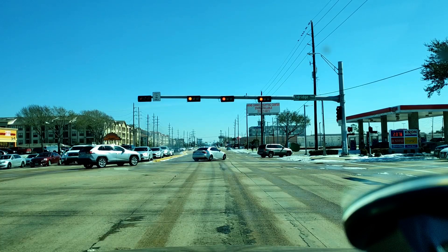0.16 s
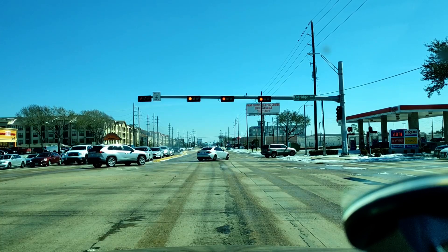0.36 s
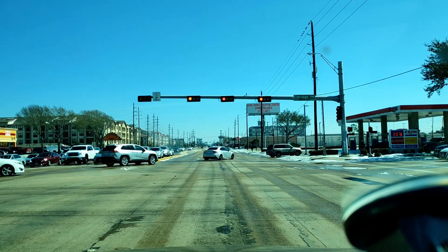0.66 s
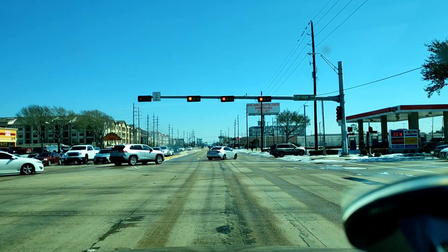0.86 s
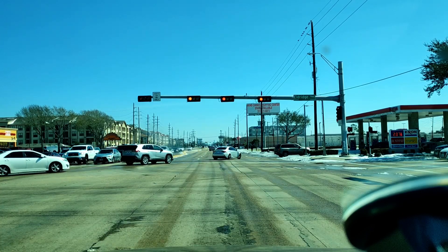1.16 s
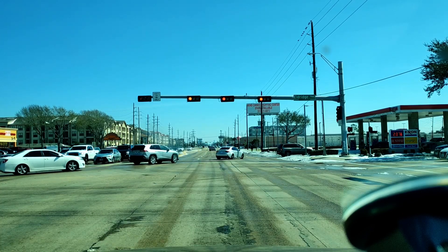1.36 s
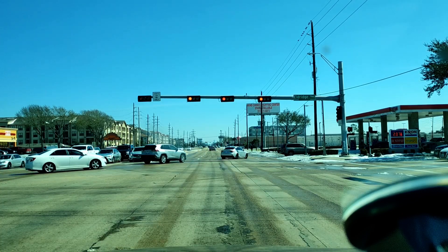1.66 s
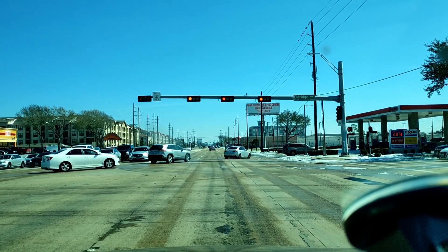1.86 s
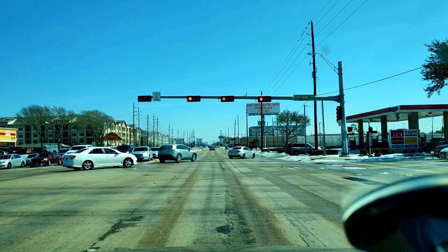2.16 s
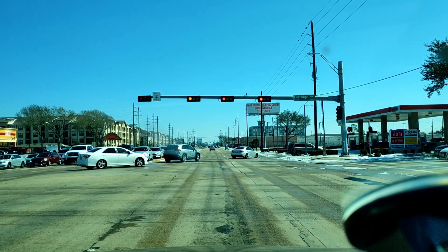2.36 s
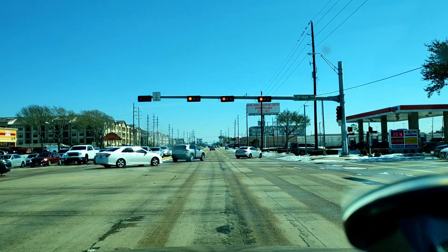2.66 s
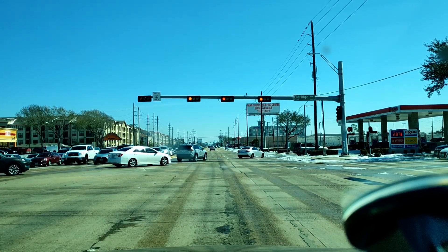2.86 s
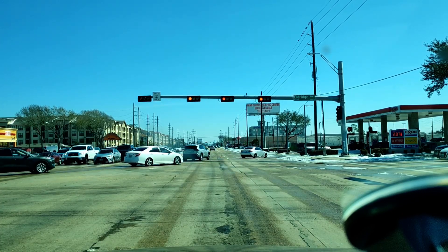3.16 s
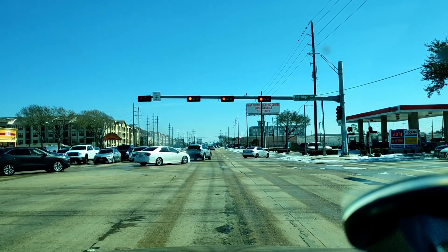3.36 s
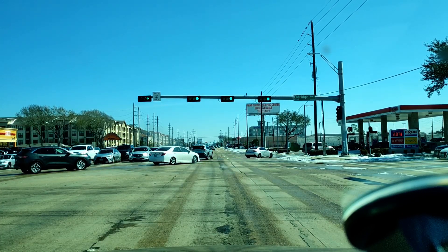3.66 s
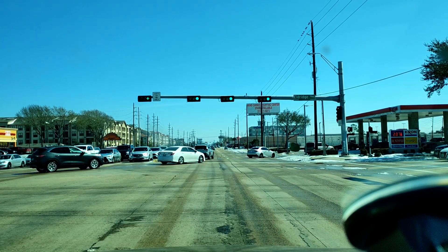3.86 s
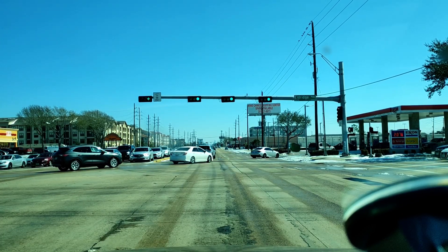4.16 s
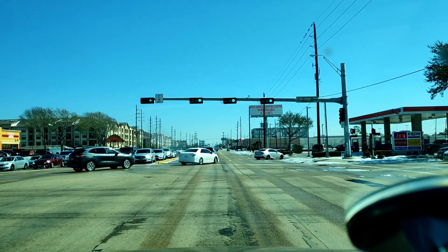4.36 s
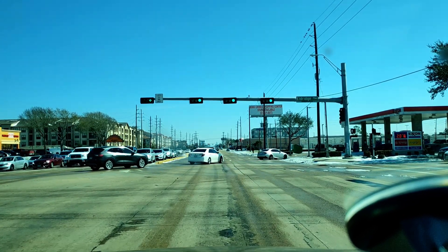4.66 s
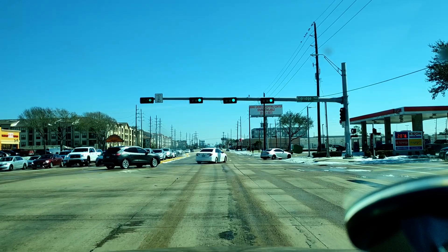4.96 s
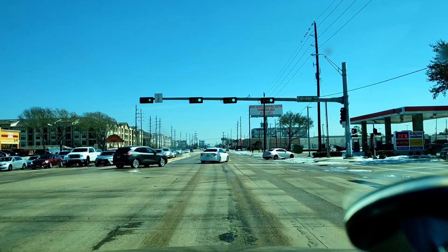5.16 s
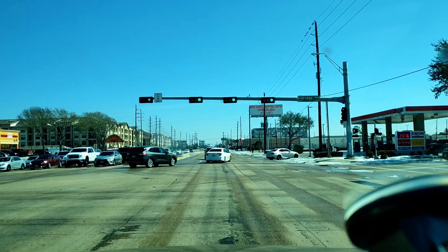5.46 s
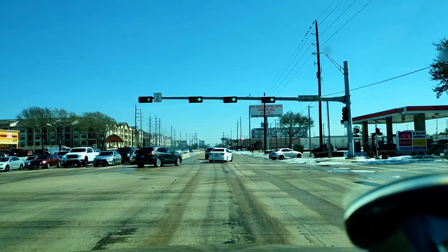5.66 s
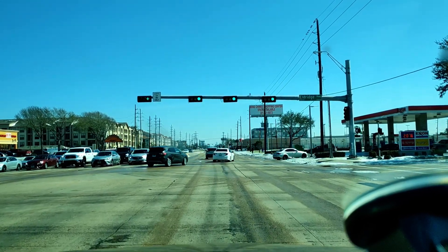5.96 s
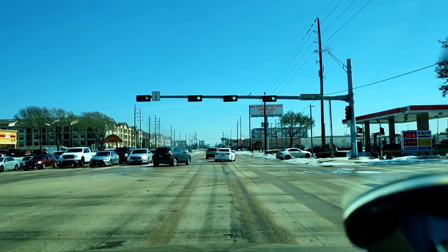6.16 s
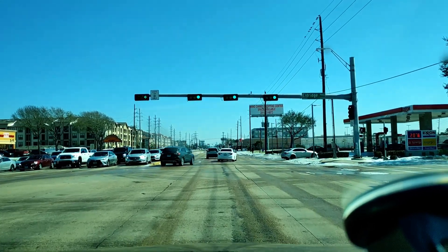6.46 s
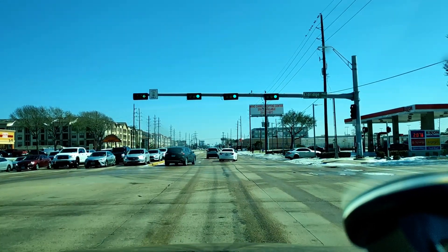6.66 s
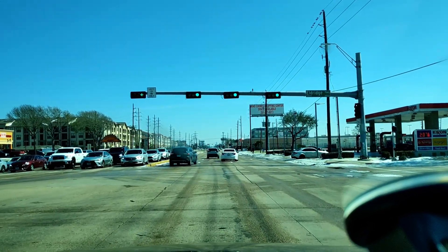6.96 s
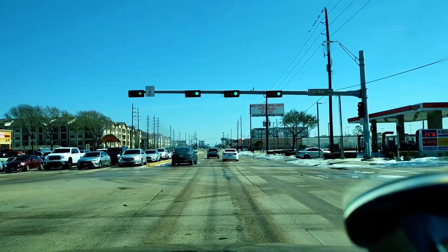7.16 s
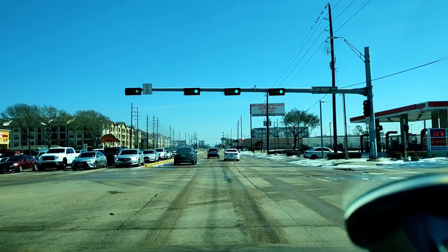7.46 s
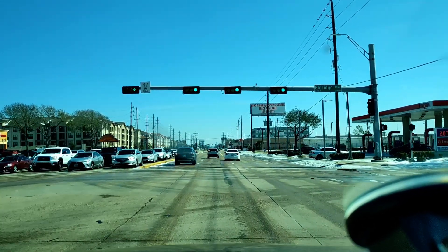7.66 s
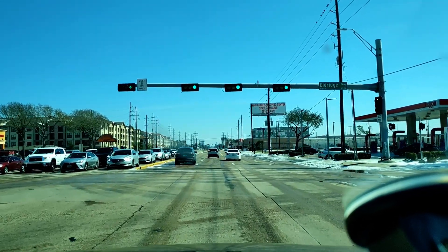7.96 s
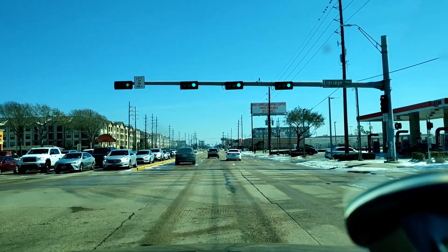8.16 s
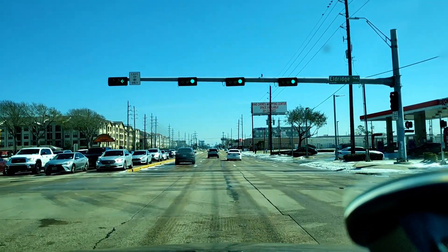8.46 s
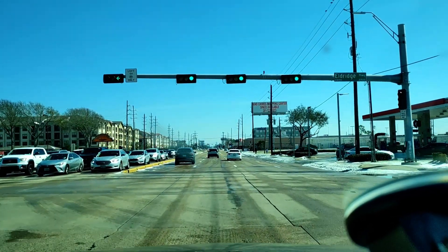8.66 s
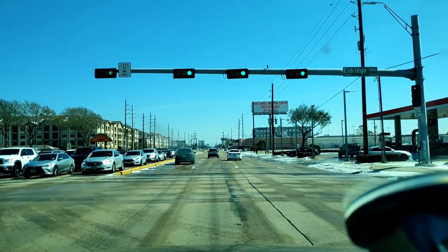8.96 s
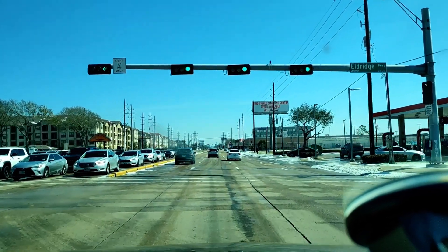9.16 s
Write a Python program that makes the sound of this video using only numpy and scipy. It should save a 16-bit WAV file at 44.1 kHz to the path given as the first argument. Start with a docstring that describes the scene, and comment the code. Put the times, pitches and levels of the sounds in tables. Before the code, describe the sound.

A car waits at a junction, its low idle and air blower picked up by a stereo microphone on the dashboard. Near halfway come a brief plastic creak, a few light clicks and a faint brake hiss. The engine then climbs in pitch as the car moves off, shifting up once while tyre noise and low rumble grow. Road joints thump softly through the cabin, and the camera mount ticks close on the left.

```python
"""Pulling away from a junction

Inside a car, stereo microphone on the dashboard. A six-cylinder engine idles under the ventilation fan,
then pulls away and changes up once. Cabin trim is touched, clicks and creaks, the brakes let go with a
soft hiss, and tyre roar and body rumble build. Faint hollow cabin resonances come and go. As the car
rolls, the camera mount ticks close to the left port and road joints jolt the cabin."""
import sys
import numpy as np
from scipy import signal
from scipy.fft import rfft, irfft, next_fast_len
from scipy.io import wavfile
from scipy.ndimage import map_coordinates

SR = 44100
rng = np.random.default_rng(int(sys.argv[2]) if len(sys.argv) > 2 else 0)


def to_wav(s):
    """Save 16-bit WAV."""
    ch = np.atleast_2d(s).T  # columns
    pcm = np.round(np.clip(ch, -1, 1) * 32767)  # PCM
    wavfile.write(sys.argv[1], SR, pcm.astype(np.int16))


N = 410571
TIME = np.arange(N) / SR

# The three noises of cabin trim. Each row: frequency in Hz, relative density in dB.
SNAP_SPECTRUM = [(300, -32), (1500, -2), (3600, -11.5), (4400, -4.5), (6300, -10), (7200, -5), (7650, 4),
                 (8200, 1.5), (10000, 1), (14000, -0.5)]
PANEL_SPECTRUM = [(150, 4), (500, 6.5), (850, -7), (1150, -3), (1550, 3), (1800, 4), (2200, 7), (2700, 3),
                  (3600, 0), (5000, -0.5), (8000, -3), (14000, -23)]
THUD_SPECTRUM = [(60, -24), (200, 5.5), (400, -1), (580, 0), (820, -13), (1020, -17), (1500, -15.5),
                 (2100, -34), (6000, -72)]


def amp(db):
    """Decibels to gain."""
    return 10 ** (np.asarray(db) / 20)


def unit(x):
    """Scale to rms 1."""
    return x / np.sqrt(np.mean(x ** 2) + 1e-20)


def along(points, hz):
    """Read (Hz, value) points on a log frequency axis."""
    freqs, values = np.transpose(points)
    return np.interp(np.log(hz + 1), np.log(freqs + 1), values)


def curve(points):
    """Join (seconds, value) points into one value per sample."""
    return np.interp(TIME, *np.transpose(points))


def wobble(rate):
    """A smooth random curve, rate knots a second."""
    knots = rng.standard_normal(int(N * rate / SR) + 4)
    coarse = TIME[::16]
    return np.interp(TIME, coarse, map_coordinates(knots, [coarse * rate]))


def ramp(start, length):
    """A straight rise from 0 to 1, times in seconds."""
    return np.clip((TIME - start) / length, 0, 1)


def swell(centre, half):
    """A bell-shaped envelope, times in seconds."""
    return np.exp(-((TIME - centre) / half) ** 2)


def burst(start, rise, t60):
    """An envelope that rises, then dies away by 60 dB in t60 seconds."""
    return ramp(start, rise) * amp(-60 * np.clip((TIME - start - rise) / t60, 0, 2))


def filtered(x, response):
    """Filter x by a gain given as a function of Hz."""
    size = next_fast_len(N + SR // 2)
    hz = np.fft.rfftfreq(size, 1 / SR)
    return irfft(rfft(x, size) * response(hz), size)[..., :N]


def cabin_noise(spectrum):
    """Stereo noise of rms 1 at the dashboard: alike in the bass, diffuse in the treble."""
    # Each row: frequency in Hz, correlation of left and right.
    likeness = [(45, 1), (68, 0.61), (130, 0.75), (280, 0.78), (620, 0.41), (1340, -0.29), (2900, 0.043),
                (14000, -0.035)]

    def colour(hz):
        width = np.arccos(np.clip(along(likeness, hz), -1, 1)) / 2
        return amp(along(spectrum, hz)) * np.array([np.cos(width), np.sin(width)])

    mid, side = filtered(rng.standard_normal((2, N)), colour)
    return unit(np.array([mid + side, mid - side]))


def ringing(modes, centre_hz, spread_octaves, t60):
    """Stereo ring of a struck part; the place of contact favours the modes near centre_hz."""
    t = np.arange(SR // 6) / SR
    hz, db = np.transpose(modes)
    weight = amp(db) * np.exp(-(np.log2(hz / centre_hz) / spread_octaves) ** 2)
    phase = rng.uniform(0, 2 * np.pi, (2, len(hz), 1))
    tones = weight[:, None] * np.sin(2 * np.pi * hz[:, None] * t + phase)
    return np.sqrt(2) * tones.sum(axis=1) / np.linalg.norm(weight) * amp(-60 * t / t60)


def mic_hiss(mic_hiss_db=-71):
    """The thin steady hiss of the microphone."""
    # Each row: frequency in Hz, relative density in dB.
    mic_hiss_spectrum = [(300, -18), (2000, -1.5), (4000, -0.5), (5450, -3), (5870, 1), (6150, -5),
                         (6630, -0.5), (7000, -4.5), (9200, -1), (9500, -2), (9900, 0), (10200, -5.5),
                         (11400, -1), (12000, -1), (14000, 0)]
    return amp(mic_hiss_db) * cabin_noise(mic_hiss_spectrum)


def ventilation(fan_db=-47):
    """The blower hums through its ducts."""
    # Each row: frequency in Hz, relative density in dB.
    fan_spectrum = [(15, -14.5), (35, 1), (70, -0.5), (115, 0.5), (160, -9.5), (220, -10), (300, -11),
                    (420, -16), (510, -19), (600, -18.5), (660, -20), (765, -16), (815, -27), (1080, -31.5),
                    (1230, -25), (1350, -33), (2500, -43), (9000, -72)]
    return amp(fan_db + 0.63 * wobble(4.6)) * cabin_noise(fan_spectrum)


def cabin_drones(rough_rad=0.33, waver_db=0.5):
    """Faint hollow cabin resonances near 200-260 Hz that swell, glide and fade."""
    # Each row: centre in seconds, pitch in Hz, base level in dB, half length in seconds, glide in Hz/s.
    drones = [(2.75, 204.8, -50.5, .07, 36), (4.262, 206.6, -54.5, .09, 99), (5.25, 194, -54, .11, -2),
              (5.84, 197.2, -50, 0.087, 57), (6.86, 210.7, -44, .08, 23), (7.02, 201.4, -46, .07, -46.5),
              (7.73, 215.5, -42, .1, 90.5), (8.02, 193.8, -49, .18, -0.5), (8.3, 260.2, -52, .14, 45),
              (8.85, 225, -42, .13, -90), (9.22, 221.5, -44, 0.091, 39)]
    # What the cabin lets through of their harmonics. Each row: frequency in Hz, gain in dB.
    cabin_colour = [(190, 2.5), (270, -1.5), (400, -19.5), (475, -13), (530, -14.5), (650, -26), (730, -13),
                    (790, -5), (900, -28)]
    out = np.zeros(N)
    unsteady = rough_rad * wobble(30)
    wavers = [amp(waver_db * wobble(25)) for _ in range(3)]
    for centre, pitch_hz, db, half, glide in drones:
        shape = swell(centre, half)
        live = shape > 1e-3
        hz = np.abs(pitch_hz + glide * (TIME[live] - centre))
        angle = 2 * np.pi * np.cumsum(hz) / SR + unsteady[live]
        for harmonic, waver in enumerate(wavers, 1):
            gain = amp(db + along(cabin_colour, harmonic * hz))
            out[live] += gain * shape[live] * waver[live] * np.sin(harmonic * angle)
    return np.sqrt(2) * out


def brakes(hiss_db=-62, pedal_s=4.9, pads_free_s=5.48, fade_db_per_s=7):
    """A soft hiss starts as the pedal lifts, swells as the pads let go, then fades."""
    # Each row: frequency in Hz, relative density in dB.
    hiss_spectrum = [(500, 6), (1500, 2.5), (3000, 1.5), (6000, -0.5), (7500, 2.5), (9500, 0), (12000, 3),
                     (14000, -0.5)]
    fade_db = fade_db_per_s * np.maximum(TIME - pads_free_s, 0)
    level_db = hiss_db + 4.5 * swell(pads_free_s, 0.12) - fade_db + 0.67 * wobble(30)
    return ramp(pedal_s, 0.068) * amp(level_db) * cabin_noise(hiss_spectrum)


def road_speed(roll_off_s=5.16, pickup_s=2.2):
    """Share of cruising speed: the car picks up quickly, then ever more gently."""
    return 1 - np.exp(-np.maximum(TIME - roll_off_s, 0) / pickup_s)


def tyres(roar_db=-38, tread_db=-62, patchy_db=1.0):
    """Rolling roar with the tyre cavity's ring, and tread hiss; both follow speed and road texture."""
    # Each row: frequency in Hz, relative density in dB.
    roar_spectrum = [(30, -8), (60, 1), (95, -0.5), (145, -5.5), (175, -6.5), (215, -3.5), (260, -10),
                     (330, -11), (470, -14.5), (620, -21), (800, -23.5), (1000, -31.5), (1500, -35),
                     (8000, -83)]
    tread_spectrum = [(400, -6), (1000, -10.5), (1800, 4), (2800, 2), (3150, 0), (3380, 3), (3750, -1.5),
                      (5500, -3.5), (7000, -4), (8500, -7.5), (10500, -9), (14000, -12.5)]
    # Each row: centre in seconds, extra noise in dB, half length in seconds.
    coarse_stretches = [(5.974, 1.5, 0.22), (8.265, 2.5, 0.28)]
    speed = road_speed()
    coarse_db = sum(db * swell(centre, half) for centre, db, half in coarse_stretches)
    texture_db = patchy_db * wobble(16)
    roar = amp(roar_db + coarse_db + texture_db) * speed ** 0.92 * cabin_noise(roar_spectrum)
    tread = amp(tread_db + coarse_db + texture_db / 2) * speed ** 0.73 * cabin_noise(tread_spectrum)
    return roar + tread


def body_rumble(shake_db=-23.5, evenness=0.28):
    """The body shakes on its springs more as the car gains speed, and heaves at each road joint."""
    # Each row: frequency in Hz, relative density in dB.
    rumble_spectrum = [(10, -14.5), (20, -8), (27, -3.5), (40, -4), (52, -12), (75, -18.5), (130, -48.5),
                       (300, -120)]
    # Each row: centre in seconds, level in dB, body pitch in Hz, half length in seconds.
    road_joints = [(6.091, -23.5, 31.2, 0.056), (6.451, -23, 27, 0.08), (6.679, -20, 23, 0.062),
                   (7.223, -15, 25.7, 0.056), (7.68, -16.5, 25.5, 0.078), (8.55, -20, 32, 0.035),
                   (8.829, -16.5, 30, 0.027), (9.287, -9, 32.07, 0.04)]
    sway = cabin_noise(rumble_spectrum)
    swing = np.sqrt(np.abs(signal.hilbert(sway[0])) ** 2 + 0.4)
    steady = unit(sway / swing ** evenness)  # keeps the low rumble's loudness even
    out = amp(shake_db) * road_speed() ** 0.82 * steady
    for centre, db, hz, half in road_joints:
        out += amp(db) * swell(centre, half) * np.sin(2 * np.pi * hz * (TIME - centre))
    return out


def mount_ticks(rise_s=0.00077, t60=0.0082, far_port_db=-25):
    """The camera mount ticks drily right beside the left microphone port."""
    # Each row: start in seconds, level in dB.
    ticks = [(7.0792, -40.5), (8.6339, -38), (8.8295, -37.5), (9.1242, -31.5), (9.275, -34), (9.2853, -23)]
    # Each row: frequency in Hz, relative density in dB.
    tick_spectrum = [(1000, -31), (4500, -17), (7400, -10), (8200, -2), (8750, -6), (9300, -6.5),
                     (10000, -6), (10600, 1), (11200, -22), (12000, 6), (12700, -14), (13400, -1),
                     (14500, -9)]
    envelope = sum(amp(db) * burst(start, rise_s, t60) for start, db in ticks)
    return envelope * cabin_noise(tick_spectrum) * np.array([[1], [amp(far_port_db)]])


def trim_touches(grain_db=1.5, spread_octaves=0.44, ring_outlasts=1.16):
    """Each touch is a grainy plastic snap, the panel's answer with its ringing modes, and a dull thud."""
    # Each row: start in seconds, snap, panel and thud levels in dB, ring centre in Hz,
    # ring level in dB, rise and 60 dB decay in seconds.
    touches = [(3.758, -84, -72, -77, 2520, -64, .0038, 0.066),
               (4.369, -50, -49.5, -50, 2600, -60, 0.0021, 0.1),
               (4.495, -47, -63, -43.5, 7400, -61, 0.00041, 0.058),
               (4.534, -56, -62, -43, 7400, -65, .001, 0.098),
               (4.558, -58, -74, -56, 7400, -66, .0024, 0.098),
               (4.678, -62.5, -69, -55, 7540, -75, 0.018, 0.15),
               (5.475, -58, -61, -69, 3000, -70, .0097, .1),
               (5.612, -55, -70, -70, 7850, -65, 0.0034, 0.11),
               (5.842, -64, -64, -65, 7500, -68, .006, 0.082),
               (5.984, -49.5, -49.5, -38.5, 2090, -42, .0055, .07),
               (6.13, -63, -56, -75, 6460, -68, 0.01, 0.11),
               (6.241, -39, -45, -44, 2000, -47, 0.00138, 0.072),
               (6.254, -75, -57, -67, 3400, -52.5, 0.0081, 0.083),
               (6.37, -62, -54, -64, 2700, -54.5, 0.0035, 0.11),
               (6.386, -53.5, -55.5, -59, 4200, -60, 0.0088, .1),
               (7.168, -83, -63, -37, 1400, -56, 0.001, .035),
               (9.284, -32.5, -39, -36, 5000, -44, 0.0017, 0.083)]
    # Each row: frequency in Hz, relative level in dB.
    panel_modes = [(815, 2), (1400, -7), (1560, -1), (1890, -1), (2130, 2), (2510, -4), (2860, -4),
                   (3320, -5), (4120, -8), (4300, -9), (4690, -5), (6320, -2), (7380, 1), (7950, -5)]
    snap, panel, thud = np.zeros((3, N))
    ring = np.zeros((2, N + SR))
    for start, snap_db, panel_db, thud_db, hz, ring_db, rise, t60 in touches:
        shape = burst(start, rise, t60)
        snap += amp(snap_db) * shape
        panel += amp(panel_db) * shape
        thud += amp(thud_db) * shape
        tones = ringing(panel_modes, hz, spread_octaves, ring_outlasts * t60)
        attack = np.minimum(np.arange(tones.shape[1]) / (SR * rise / 2), 1)
        onset = round((start + rise / 2) * SR)
        ring[:, onset:onset + len(attack)] += amp(ring_db) * attack * tones
    grain = amp(grain_db * wobble(500))
    clicks = snap * cabin_noise(SNAP_SPECTRUM) + panel * cabin_noise(PANEL_SPECTRUM) + ring[:, :N]
    return grain * clicks + thud * cabin_noise(THUD_SPECTRUM)


def trim_creak(slip_spread_db=1.0, uneven=0.3, grit_t60=0.02, tail_t60=0.13):
    """Plastic sticks and slips unevenly; each slip sheds grit and rings the part, lower as the rub ends."""
    # Each row: centre in seconds, snap, panel and thud levels in dB, ring centre in Hz,
    # ring level in dB, half length in seconds, slips per second.
    strokes = [(4.257, -50, -59, -46.5, 7560, -53.5, 0.02, 430),
               (4.289, -56, -56, -59, 6400, -52.5, 0.014, 460),
               (4.301, -61, -52, -68, 3000, -49.5, 0.0097, 370)]
    # Each row: frequency in Hz, relative level in dB.
    part_modes = [(2280, -9), (2560, -2), (3100, 0), (3430, -12), (3980, 0), (5160, 6), (6160, 2),
                  (6610, 1), (7180, 2), (7370, -2), (7830, -4), (8150, -9), (8700, -5)]
    slip_rate = curve([(row[0], row[-1]) for row in strokes]) * np.exp(uneven * wobble(200))
    slip_count = np.floor(np.cumsum(slip_rate) / SR)
    slips = unit(np.diff(slip_count, prepend=0) * amp(slip_spread_db * wobble(400)))
    t = np.arange(SR // 20) / SR
    grit = unit(signal.oaconvolve(slips, amp(-60 * t / grit_t60))[:N])
    snap, panel, thud = np.zeros((3, N))
    ring = np.zeros((2, N))
    for centre, snap_db, panel_db, thud_db, hz, ring_db, half, _ in strokes:
        rub = swell(centre, half)
        shape = np.maximum(rub, 0.84 * burst(centre - half, half, tail_t60))  # lingers in the cabin
        snap += amp(snap_db) * shape
        panel += amp(panel_db) * shape
        thud += amp(thud_db) * shape
        tones = ringing(part_modes, hz, spread_octaves=0.6, t60=0.022)
        tones /= np.linalg.norm(tones[0])
        ring += amp(ring_db) * signal.oaconvolve((slips * rub)[None], tones, axes=1)[:, :N]
    scrape = snap * cabin_noise(SNAP_SPECTRUM) + panel * cabin_noise(PANEL_SPECTRUM)
    return grit * scrape + ring + thud * cabin_noise(THUD_SPECTRUM)


def engine_effort(gear_s=4.25, throttle_s=5.16, pull_s=5.36, lull_s=7.1):
    """Load 0-1 and gain in dB: in gear, on the throttle, then briefly softer as the revs keep climbing."""
    throttle = ramp(throttle_s, 0.28)
    held_in_gear = ramp(gear_s, 0.1) * (1 - throttle)
    load = 0.29 * held_in_gear + throttle
    gain_db = -2.5 * held_in_gear - throttle  # the idle sags as the gear takes hold
    gain_db += 0.5 * swell(pull_s, 0.17) - 5.5 * swell(lull_s, 0.24)
    return load, gain_db


def idle_shudder(shudder_db=-42):
    """The idling engine rocks unevenly on its mounts and steadies under load."""
    # Each row: frequency in Hz, relative density in dB.
    shudder_spectrum = [(15, -20), (23, -2.5), (27, 0), (32, 4), (36, 0), (42, -10.5), (60, -24),
                        (120, -61.5)]
    load, _ = engine_effort()
    return amp(shudder_db) * (1 - load) * cabin_noise(shudder_spectrum)


def engine(idle_waver=0.55, load_waver=1.06, jitter=0.0026, rough=0.015, flutter=0.058):
    """Six cylinders sound as crankshaft orders; load shifts their balance and makes the cabin boom."""
    # Each row: time in seconds, firing rate in Hz. The drop near 7.8 s is the change up.
    firing_rate = [(0, 44.35), (4.2, 44.35), (4.5, 44.1), (4.85, 44.2), (5.13, 46), (5.5, 57.7),
                   (5.78, 65.7), (6.0, 69.5), (6.2, 71.1), (6.52, 74.7), (7.0, 79.7), (7.45, 85.4),
                   (7.68, 84), (7.85, 77), (8.0, 79.5), (8.3, 85.2), (8.7, 86.8), (9.31, 89.6)]
    # One entry per order: multiple of the shaft rate, base level in dB at idle, the same under load.
    orders = [2, 3, 4, 4.5, 6, 7.5, 9, 12, 13.5, 15, 18, 20, 21, 24, 27, 30, 40]
    idle_levels = [-35.5, -30, -53, -54.5, -48.5, -55.5, -55, -67, -64.5, -77.5, -59.5, -70, -69.5, -68.5,
                   -74, -68, -75.5]
    pull_levels = [-48, -33.5, -57.5, -49, -43.5, -57.5, -55, -57.5, -69, -64.5, -58, -74, -67, -71, -70,
                   -65, -77]
    # Each row: frequency in Hz, gain under load in dB.
    cabin_boom = [(45, 5), (60, 0), (70, -2), (82, -4), (92, 3.5), (112, 8), (128, 2), (142, -12),
                  (170, -3.5), (205, -2), (232, -4), (262, 5.5), (300, -3), (345, -1), (385, -4.5),
                  (420, -1.5), (445, -8), (480, -1), (560, -11.5), (790, -7), (1000, -10)]
    load, gain_db = engine_effort()
    idle = 1 - load
    shaft_hz = curve(firing_rate) / 3 * (1 + jitter * wobble(12))  # three firings a turn
    angle = 2 * np.pi * np.cumsum(shaft_hz) / SR
    port_phase = 0.028 * load * np.array([[1], [-1]])
    out = np.zeros((2, N))
    for order, idle_db, pull_db in zip(orders, idle_levels, pull_levels):
        db = idle * idle_db + load * (pull_db + along(cabin_boom, order * shaft_hz))
        # uneven combustion unsettles the high orders most, in level and in phase
        unrest = np.sqrt(order / 2)
        waver_db = unrest * (idle_waver * idle + load_waver * load) * wobble(13)
        smear = (rough * order * load + flutter * unrest * idle) * wobble(25)
        phase = order * angle + smear + port_phase + rng.uniform(0, 2 * np.pi)
        out += amp(db + waver_db) * np.sin(phase)
    return np.sqrt(2) * amp(gain_db) * out


def scene():
    """Everything heard from the dashboard."""
    bed = engine() + idle_shudder() + cabin_drones() + ventilation() + mic_hiss()
    return bed + tyres() + body_rumble() + brakes() + trim_touches() + trim_creak() + mount_ticks()


def record(dry, top_hz=14400, fade_in_s=0.01):
    """Each microphone port has its own colour; nothing passes above top_hz."""
    # Each row: frequency in Hz, gain in dB.
    left_port = [(40, 2.2), (110, 1), (300, -1), (700, -0.56), (4000, -1), (6500, 0), (8000, 0), (9500, 4),
                 (12000, 2), (14000, -1)]
    right_port = [(40, 2), (110, 0), (300, -0.5), (700, -1.57), (4000, -0.5), (5500, 0.5), (7700, 6.5),
                  (9000, 1.5), (10700, -5.5), (14000, -7.5)]
    ports = lambda hz: amp([along(left_port, hz), along(right_port, hz)]) * (hz < top_hz)
    return filtered(dry * ramp(0, fade_in_s), ports)


dry = scene()
out = record(dry)
to_wav(out)
```